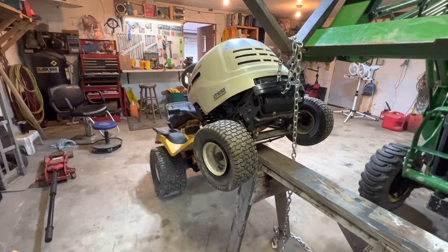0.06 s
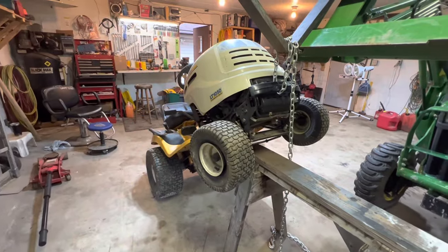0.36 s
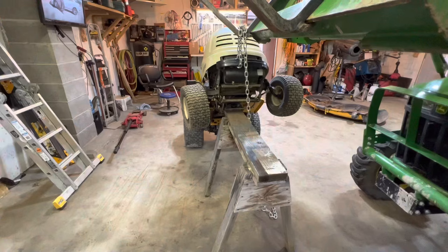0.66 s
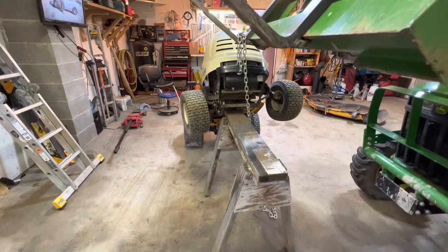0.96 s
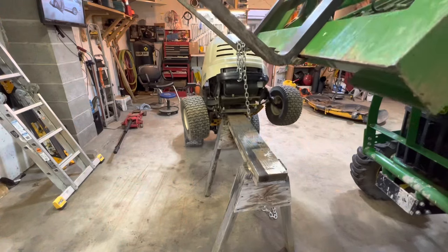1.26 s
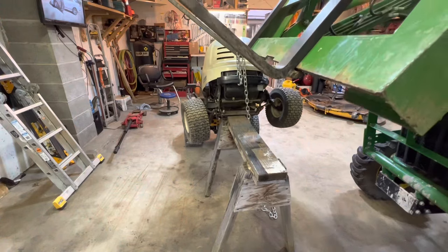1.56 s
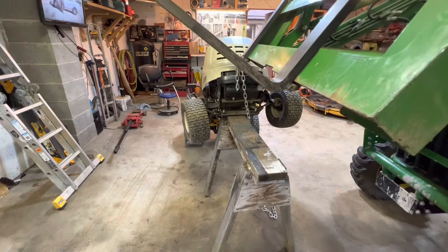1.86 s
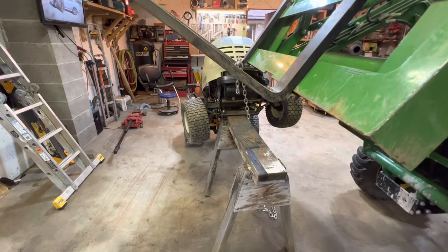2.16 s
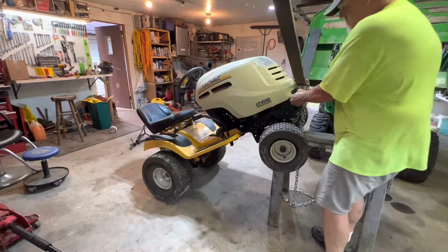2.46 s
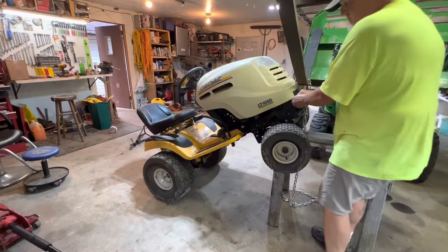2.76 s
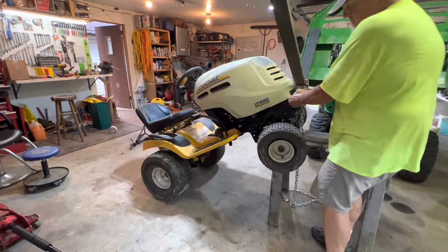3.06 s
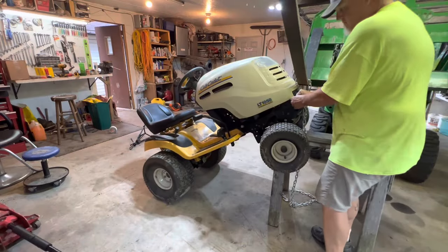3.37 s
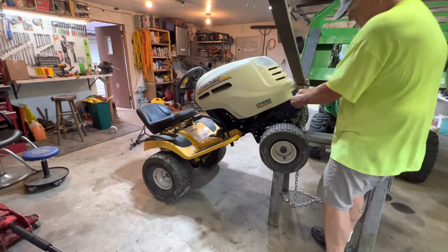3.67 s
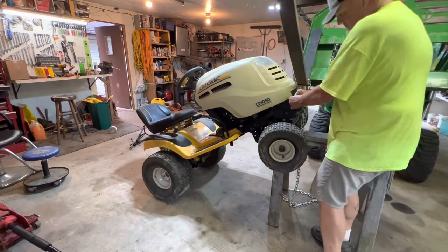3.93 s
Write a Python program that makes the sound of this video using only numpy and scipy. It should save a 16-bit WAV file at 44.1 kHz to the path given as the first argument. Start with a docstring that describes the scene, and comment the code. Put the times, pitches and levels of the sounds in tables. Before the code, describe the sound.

A metal chain clinks and knocks on a hollow loader bucket while hydraulics hiss softly. Then a lawn tractor is worked onto a steel trestle with hollow thumps, ringing clanks and rattling panels, echoing briefly in a hard workshop.

```python
"""A lawn tractor is hoisted by a chain from a loader bucket and worked onto a steel trestle in a workshop.
After a short squeak and a mains hum, oil hisses through the loader's valve while the chain clinks
and knocks on the bucket. Then the chassis thumps and clanks on the beam and its loose panels rattle.
Each blow is fading noise plus a few clear notes of the struck metal, and the hard room rings after it."""
import sys
import numpy as np
from scipy import signal
from scipy.fft import rfft, irfft
from scipy.io import wavfile
from scipy.ndimage import uniform_filter1d

SR = 44100
rng = np.random.default_rng(int(sys.argv[2]) if len(sys.argv) > 2 else 0)


def put_to_file(sound):
    """Save the sound as 16-bit audio at rate SR, in the file named by the first command-line argument."""
    columns = np.atleast_2d(sound).T  # one column per channel
    safe = np.clip(columns, -1, 1)
    whole_steps = np.round(safe * 32767)
    wavfile.write(sys.argv[1], SR, whole_steps.astype(np.int16))


N = 176400
ROOM_T60 = 0.56  # longest echo; a "t60" is the seconds a sound takes to fade by 60 dB
# how alike the left and right sides sound (frequency [Hz], likeness [0 to 1])
STEREO_LIKENESS = [(140, 0.93), (650, 0.23), (2000, 0.051)]


def tractor():
    """The chassis lands with hollow thumps and the steel frame clanks on the beam."""
    # blows (time [s], level [dB], brightness [dB per octave], rise [s], ring t60 [s])
    thumps = [(2.413, -36, 1.5, 0.029, 0.46), (2.468, -31.5, -1.5, 0.0044, 0.1),
              (2.588, -41.5, 0.1, 0.01, 1), (3.153, -18, -2, 0.016, 0.24), (3.175, -18, -2.5, 0.0098, 0.28),
              (3.255, -27, -5.5, 0.0043, 0.43), (3.622, -25, -2.5, 0.017, 0.17),
              (3.660, -28, -1, 0.0025, 0.64)]
    clanks = [(2.655, -36.5, -2.5, 0.0065, 0.45), (2.786, -25, -0.96, 0.007, 0.42),
              (3.122, -34, -1.5, 0.013, 0.11), (3.213, -22, 3.1, 0.00039, 0.47),
              (3.708, -24, 4.5, 0.0011, 0.41)]
    # tone colour of each part's noisy ring (frequency [Hz], level [dB])
    chassis_colour = [(35, -13), (110, -12.5), (150, 0), (230, -10.5), (400, 2.5), (500, -6.5), (1100, -8),
                      (3200, -20.5), (9000, -23.5), (15000, -52)]
    frame_colour = [(50, -24), (160, -7.5), (1200, 6.5), (4200, -3), (6300, -0.5), (10000, -4),
                    (11500, -24), (14500, -11), (16500, -54)]
    # clear notes of each part (frequency [Hz], level [dB])
    chassis_notes = [(392, -2.5), (425, -6.5), (955, -15), (992, -5.5)]
    frame_notes = [(890, 3.5), (1077, 2.5), (1319, 0), (1712, 6), (1997, -10), (2158, 2.5), (3370, 0)]
    thumping = blows(thumps, chassis_colour, room_db=-7, damping=0.16, ripple_hz=13, ripple_db=2,
                     notes=chassis_notes, notes_db=-7, purity=0.65, notes_t60=0.27, detune=0.013)
    clanking = blows(clanks, frame_colour, room_db=-1, damping=0.08, ripple_hz=24.98, ripple_db=2,
                     notes=frame_notes, notes_db=-2.5, purity=0, notes_t60=0.53, detune=0.0037)
    return thumping + clanking


def chain():
    """Links of slightly unequal pitch clink on each other and knock on the hollow bucket."""
    # blows (time [s], level [dB], brightness [dB per octave], rise [s], ring t60 [s])
    clinks = [(1.307, -41.5, 1, 0.0027, 0.59), (1.559, -33.5, 1.5, 0.0053, 0.32),
              (1.604, -23.5, 4, 0.0016, 0.4), (1.628, -27, 11, 0.0021, 0.59),
              (1.688, -15, 5.5, 0.0048, 0.27), (1.711, -21, 2, 0.0027, 0.3),
              (1.921, -37, -2.5, 0.0093, 0.65), (2.008, -26.5, 4.5, 0.0046, 0.22)]
    knocks = [(.772, -49.5, -3.5, 0.005, 0.45), (.975, -50.5, -2, 0.017, 0.64),
              (1.090, -28, -1.2, 0.0071, 0.29), (1.372, -33, -0.5, 0.025, 0.42),
              (1.412, -30.5, -0.25, 0.016, 0.43), (1.594, -32.5, 0.5, 0.0016, 0.72),
              (2.110, -32, 1.5, 0.012, 0.53)]
    # tone colour of the noisy ring of links and bucket (frequency [Hz], level [dB])
    link_colour = [(80, -58), (600, 5), (1200, 3), (1900, 5.5), (6200, -1.5), (9500, -9.5), (14500, -17),
                   (16500, -48)]
    bucket_colour = [(80, -39.5), (380, -4.5), (660, 0), (950, -4), (1450, -2), (2500, -7.5), (15000, -32)]
    # their clear notes (frequency [Hz], level [dB])
    link_notes = [(1658, 5), (2150, 0), (3148, 3), (4420, -4), (5926, 4.5), (6621, -9), (7870, -4),
                  (11064, -1), (12866, -7), (15070, -13)]
    bucket_notes = [(592, -9.5), (715, -1.5), (784, -0.5), (872, -6.5)]
    clinking = blows(clinks, link_colour, room_db=-5.5, damping=0.36, ripple_hz=75.64, ripple_db=7.5,
                     notes=link_notes, notes_db=-6, purity=0, notes_t60=0.4, detune=0.002)
    knocking = blows(knocks, bucket_colour, room_db=-34, damping=0.027, ripple_hz=12, ripple_db=4.5,
                     notes=bucket_notes, notes_db=-5, purity=0.41, notes_t60=0.4, detune=0.0203)
    return clinking + knocking


def blows(table, colour, notes_db, purity, **body):
    """Strikes one object repeatedly; its notes stand out more in softer blows (purity, dB per dB)."""
    out = np.zeros((2, N))
    hardest_db = max(row[1] for row in table)
    for start, db, brightness, rise, ring_t60 in table:
        clear_db = notes_db + purity * (hardest_db - db)
        add(out, start, amp(db) * blow(colour, brightness, rise, ring_t60, notes_db=clear_db, **body))
    return out


def blow(colour, brightness, rise, ring_t60, room_db, damping, ripple_hz, ripple_db,
         notes, notes_db, notes_t60, detune, count=4, size=40960):
    """One blow on metal: a noisy ring whose treble dies first, the room's echo, and clear notes."""
    t, hz = np.arange(size) / SR, np.fft.rfftfreq(size, 1 / SR)
    body = amp(read(colour, hz))
    tilt = amp(brightness * np.log2(hz / 1000 + .1))
    tilt *= np.linalg.norm(body) / np.linalg.norm(body * tilt)  # brighter, but no stronger overall
    spectrum = rfft(noise(lambda f: body * tilt * ripple(f, ripple_hz, ripple_db), size))
    out = np.zeros((2, size))
    centres = np.geomspace(125, 16000, 6)  # six bands [Hz], each fading at its own speed
    fading_s = np.maximum(t - 0.0055, 0)  # the contact chatters briefly before the fade
    for centre, pick in zip(centres, np.eye(len(centres))):
        band = irfft(spectrum * np.interp(np.log(hz + 1), np.log(centres), pick), size)
        ring = fade(fading_s, ring_t60 * (2000 / centre) ** damping)
        echo = amp(room_db) * fade(t, room_t60(centre))
        out += band * np.sqrt(ring ** 2 + echo ** 2 * (1 - ring ** 2))
    total = np.sqrt(sum(amp(db) ** 2 for _, db in notes))
    for note_hz, db in notes:
        pitches = note_hz * (1 + detune * (2 * rng.random(count) - 1))  # close pitches make it waver
        waves = np.exp(2j * np.pi * np.outer(pitches, t))
        tone = (stereo_phases(note_hz, count) @ waves).real * np.sqrt(2 / count)
        gain = amp(notes_db + db) / total * np.interp(note_hz, hz, tilt) * sides(note_hz)
        out += gain * tone * fade(t, notes_t60 * (2000 / note_hz) ** damping)
    return out * np.minimum(t / rise, 1)


def rattle(settle_s=0.065, steady_part=0.68):
    """Many small random contacts shake the loose panels; each panel note swells and dies on its own."""
    # strength of the rattle (time [s], level [dB])
    loudness = [(2.40, -72), (2.44, -45), (2.60, -52.5), (2.92, -32), (3.02, -49.5), (3.11, -44.5),
                (3.22, -36.5), (3.43, -28), (3.57, -36), (3.78, -28), (3.92, -28.5), (4.0, -33)]
    # tone colour and clear notes of the panels (frequency [Hz], level [dB])
    panel_colour = [(40, -12), (150, -4), (1000, 1.5), (1800, -3.5), (2900, -11.5), (6300, -16.5),
                    (8500, -20), (10000, -22.5), (11500, -68)]
    panel_notes = [(919, -8), (1297, -16), (1686, -14), (2261, -21.5), (2428, -16), (3688, -28),
                   (5157, -21), (5782, -20)]
    shaking = unit(signal.lfilter([1], [1, -np.exp(-1 / (settle_s * SR))], contacts(per_s=70)))
    clatter = noise(lambda f: amp(read(panel_colour, f)) * ripple(f, width_hz=26, spread_db=5), N)
    out = unit(steady_part + shaking) * clatter
    t = np.arange(SR) / SR
    for hz, db in panel_notes:
        ring = np.sin(2 * np.pi * hz * t) * fade(t, t60=0.6)
        strikes = np.sqrt([contacts(per_s=22), contacts(per_s=22)])
        out += amp(db) * sides(hz) * unit(signal.fftconvolve(strikes, ring[None])[:, :N])
    return level(loudness) * out


def squeak(start_hz=2155, climb_hz_per_s=4670, length_s=0.052, size=16384):
    """A link slips under load with a short, rough, rising squeak, which the room prolongs."""
    t, out = np.arange(size) / SR, np.zeros((2, N))
    wobble = 0.043 * unit(uniform_filter1d(rng.standard_normal(size), 40))
    hz = (start_hz + climb_hz_per_s * t) * (1 + wobble)
    phase = 2 * np.pi * np.cumsum(hz) / SR
    swell = np.sqrt(np.sin(np.pi * np.minimum(t / length_s, 1)).clip(0))
    tone = (np.sin(phase) + amp(-8) * np.sin(1.45 * phase)) * swell
    room = noise(np.ones_like, size) * fade(t, ROOM_T60)
    echo = signal.fftconvolve(tone[None], room / np.linalg.norm(room[0]))[:, :size]
    add(out, 0, amp(-47.5) * (tone + amp(-7) * echo))
    return out


def hydraulics(start_s=0.678, end_s=2.22, fade_s=0.11):
    """Oil forced through the loader's valve hisses and whines while the bucket moves."""
    # tone colour of the oil flow; its narrow peak is the whine (frequency [Hz], level [dB])
    colour = [(3900, -20.5), (4330, 1.5), (4800, -11), (10000, -13.5), (14000, -5.5), (15300, -29)]
    t = np.arange(N) / SR
    running = np.clip(np.minimum(t - start_s, end_s - t) / fade_s, 0, 1)
    return amp(-56) * running * noise(lambda f: amp(read(colour, f)), N)


def ticks(decay_s=0.0023, size=2048):
    """Two small dry ticks as the hum stops."""
    # the ticks (time [s], level [dB])
    moments = [(.545, -36), (0.57, -38)]
    colour = [(300, 5.5), (3500, 2.5), (9000, -16.5)]  # (frequency [Hz], level [dB])
    decay = np.exp(-np.arange(size) / SR / decay_s)
    out = np.zeros((2, N))
    for start, db in moments:
        add(out, start, amp(db) * noise(lambda f: amp(read(colour, f)), size) * decay)
    return out


def background(hum_hz=239.5, hum_end_s=0.55):
    """Low room rumble, soft hiss and a brief mains hum."""
    # strength of the rumble and the hiss (time [s], level [dB])
    rumble_level = [(.56, -67), (.62, -53), (2.39, -57.5), (2.43, -41.5), (3.0, -35.5)]
    hiss_level = [(0, -44.5), (.16, -56.5), (.59, -64.5), (.78, -55.5), (2.0, -45), (2.39, -67)]
    # their tone colours (frequency [Hz], level [dB])
    rumble_colour = [(25, 9), (80, 3), (150, -2.5), (700, -12), (8000, -46.5)]
    hiss_colour = [(200, 6), (3200, 2), (5500, -8), (15000, -20)]
    t = np.arange(N) / SR
    hum_on = np.clip(np.minimum(t, hum_end_s - t) / 0.0057, 0, 1)
    hum = amp(-54) * unit(np.sin(2 * np.pi * hum_hz * t)) * hum_on
    rumble = level(rumble_level) * noise(lambda f: amp(read(rumble_colour, f)), N)
    hiss = level(hiss_level) * noise(lambda f: amp(read(hiss_colour, f)), N)
    return hum + rumble + hiss


def room_t60(hz, longest_hz=2860, width_octaves=1.62):
    """The workshop's echo lasts longest at fairly high pitches."""
    return ROOM_T60 * np.exp(-(np.log2(hz / longest_hz) / width_octaves) ** 2)


def contacts(per_s):
    """Random taps of uneven strength."""
    return rng.exponential(1, N) * (rng.random(N) < per_s / SR)


def ripple(hz, width_hz, spread_db):
    """Random peaks and dips across frequency, like many close, unrelated notes."""
    grid = np.arange(0, SR / 2, width_hz)
    heights = np.clip(rng.standard_normal(8192), -2, 2)[:len(grid)]
    return amp(spread_db * np.interp(hz, grid, heights))


def noise(gain, size):
    """Stereo noise of strength 1, shaped by a gain at each frequency."""
    hz = np.fft.rfftfreq(size, 1 / SR)
    return unit(irfft(stereo_phases(hz, len(hz)) * gain(hz) * sides(hz), size))


def stereo_phases(hz, count):
    """Random starting points for waves, left and right; most alike in the bass."""
    left, other = np.exp(2j * np.pi * rng.random((2, count)))
    same = np.clip(read(STEREO_LIKENESS, hz), -1, 1)
    return np.array([left, same * left + np.sqrt(1 - same ** 2) * other])


def sides(hz):
    """Left and right gain at each frequency."""
    # how much louder the left side is (frequency [Hz], level [dB])
    balance = [(120, 1), (280, -0.9), (3500, 2), (8000, 4)]
    return amp(np.outer([.5, -.5], read(balance, hz)))


def amp(db):
    """Turns decibels into a gain."""
    return 10 ** (np.asarray(db) / 20)


def unit(x):
    """Scales a sound to an average strength (rms) of 1."""
    return x / np.sqrt(np.mean(x ** 2) + 1e-20)


def fade(t, t60):
    """Falls by 60 dB every t60 seconds."""
    return 1e-3 ** (t / max(t60, 1e-3))


def read(points, hz):
    """Reads between the rows of a frequency table, with octaves evenly spaced."""
    f, value = np.transpose(points)
    return np.interp(np.log(hz + 1), np.log(f + 1), value)


def level(points):
    """Gain over time from a table of decibels."""
    return amp(np.interp(np.arange(N) / SR, *np.transpose(points)))


def add(mix, start_s, sound):
    """Mixes a sound in at the given time."""
    part = mix[:, round(start_s * SR):][:, :sound.shape[1]]
    part += sound[:, :part.shape[1]]


def scene():
    """Everything heard in the workshop."""
    return chain() + squeak() + hydraulics() + tractor() + rattle() + ticks() + background()


def record(dry, low_cut_hz=120, high_cut_hz=16300):
    """Trims away the deep bass and the very highest treble."""
    thinned = signal.sosfilt(signal.butter(2, low_cut_hz, "high", fs=SR, output="sos"), dry)
    treble_cut = signal.firwin(511, high_cut_hz, window=("kaiser", 9), fs=SR)
    return signal.oaconvolve(thinned, treble_cut[None], "same")


dry = scene()
out = record(dry)
put_to_file(out)
```